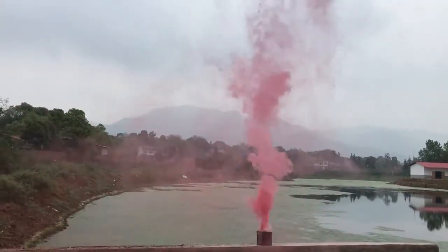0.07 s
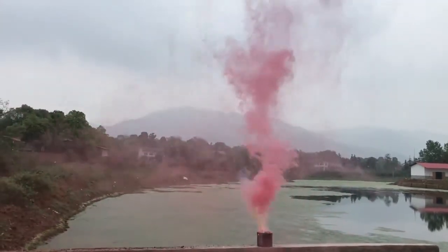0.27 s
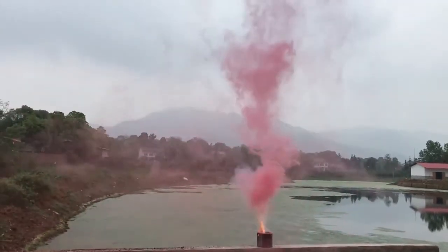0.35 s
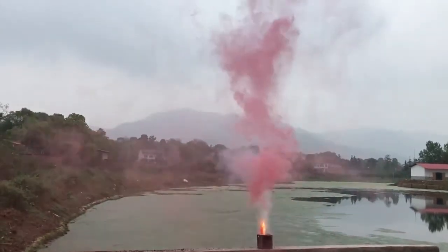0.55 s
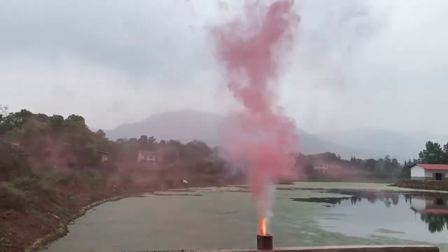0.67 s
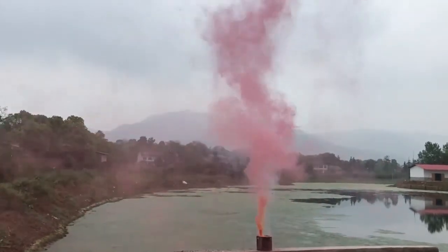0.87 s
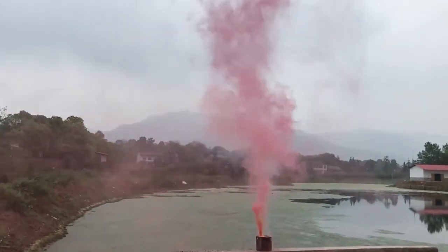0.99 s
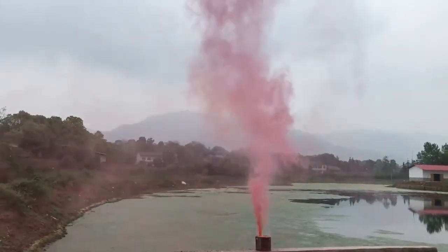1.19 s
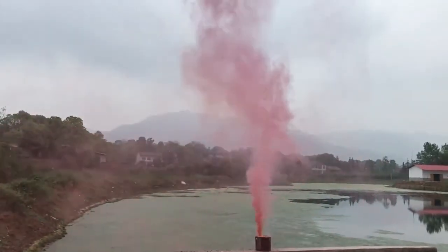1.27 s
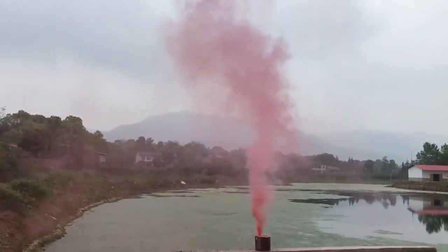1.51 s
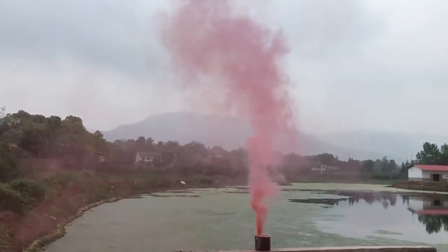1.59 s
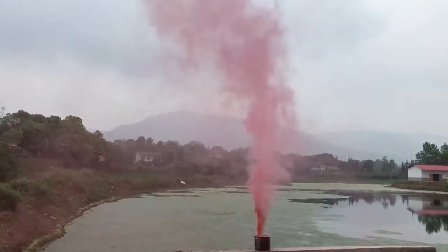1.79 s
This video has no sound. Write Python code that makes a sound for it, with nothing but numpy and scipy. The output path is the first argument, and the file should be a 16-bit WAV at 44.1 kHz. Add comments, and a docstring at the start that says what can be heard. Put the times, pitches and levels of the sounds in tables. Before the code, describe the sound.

A burning smoke canister hisses with a fine sputter, close by outdoors. Early on it flares in a bright rush that sinks to a soft low flutter, then keeps hissing over a faint rumble.

```python
"""A smoke canister burns on a wall beside a pond, its vent hissing with a fine sputter of burning grains.
It flares up once: a bright rush that sinks into a soft low flutter as the puff of gas grows and slows.
A low hum comes in as the flare dies, and a nearby hard surface gives the hiss a hollow colour.
Behind it are a low outdoor rumble with a few drones and one faint bird call."""
import sys
import numpy as np
from scipy import signal
from scipy.fft import rfft, irfft
from scipy.io import wavfile

SR = 44100
rng = np.random.default_rng(int(sys.argv[2]) if len(sys.argv) > 2 else 0)


def transcribe(u):
    """Save the signal u as a 16-bit wav file named by the first command-line argument.

    u: samples, shape (n,) or (channels, n), limited to [-1, 1]; the rate is SR.
    q: integer samples, one column per channel.
    """
    v = np.clip(np.atleast_2d(u).T, -1, 1)
    q = np.round(v * 32767).astype(np.int16)
    wavfile.write(sys.argv[1], SR, q)


N = 81585

# Tone of the gas jet at the vent. Each row: frequency in Hz, relative level in dB.
JET_SPECTRUM = [(30, -14), (90, 3.5), (250, 3.5), (500, -0.5), (700, 0), (980, -2.5), (1170, 2.5),
                (1800, -2.5), (2400, -4), (2780, -1), (2980, -7.5), (3400, 2), (4100, -1.5), (4700, -2),
                (5200, -8), (5500, -3), (6050, -3), (6600, -4), (7400, -7.5), (8100, -6.5), (9900, -9),
                (10900, -17), (11700, -8.5), (13300, -11), (15500, -11.5)]
# Swells of the steady burn. Each row: time in seconds, gain on the jet in dB.
BURN_GAIN = [(0, -2.5), (.18, -1.1), (.45, 0), (.65, -2.5), (.8, -1), (.93, -1.1), (1.03, 1), (1.12, -.5),
             (1.3, 0), (1.42, -0.2), (1.53, 1.6), (1.7, 0.4), (1.85, 0.5)]
# Brightness of the steady burn. Each row: time in seconds, tilt in dB per octave about TILT_PIVOT_HZ.
BURN_TILT = [(0, 1.9), (.2, 0.4), (.6, 1), (.8, -0.4), (1.0, 0.04), (1.4, 0.7), (1.85, 0.9)]
# Air on top of the steady burn. Each row: time in seconds, slope in dB per octave above AIR_FROM_HZ.
BURN_AIR = [(0, -4), (.2, 3), (.6, 0.5), (.9, 2), (1.2, -5), (1.5, -5), (1.85, -12)]
# Envelope of the flare. Each row: time in seconds, gain on the jet at the flare's centre in dB.
FLARE_GAIN = [(.17, -9), (.226, 2), (.243, 11.5), (.272, 15.5), (.292, 20), (.308, 20), (.322, 21.5),
              (.352, 21), (.39, 16), (.425, 17.5), (.47, 15), (.52, 14), (.565, 13), (.61, 12.5), (.69, 9),
              (.78, 5), (.95, -25)]
# Bounce off the nearby surface. Each row: frequency in Hz, amplitude as a share of the direct sound.
REFLECTION_SHARE = [(300, 0), (900, 0.79), (2500, 0.65), (4200, 0.69), (5900, 0.72), (7600, 0.8),
                    (9200, 0.57), (11000, 0.2), (14500, 0.3)]
# Arch of the distant bird call. Each row: time in seconds, pitch in Hz.
BIRD_PITCH = [(.655, 2700), (.683, 2840), (.698, 3060), (.714, 3076), (.727, 2890), (.735, 2500),
              (.745, 2450)]
# Tone of the outdoor bed. Each row: frequency in Hz, relative level in dB.
RUMBLE_SPECTRUM = [(20, -34), (32, -20), (47, 1.5), (70, 1), (130, -4), (250, -6), (320, -9), (380, -16),
                   (700, -13), (1200, -13.5), (4000, -22.5), (7600, -27.5), (11000, -31), (15000, -42)]
# Droning bands in the bed. Each row: centre in Hz, half-width in Hz, level in dB.
DRONE_BANDS = [(97.8, 4.6, -70.5), (197, 11.4, -73), (211.7, 15, -65), (290, 18.3, -66.5)]

TILT_PIVOT_HZ, AIR_FROM_HZ = 3500, 8900


def vent(gain_db=-55, frame=512):
    """The canister's hiss: one jet of gas, shaped by the steady burn, the flare and a slight flicker."""
    framing = dict(fs=SR, nperseg=frame, noverlap=frame - frame // 4)
    hz, t, jet = signal.stft(gas(), **framing)
    octave = np.log2(np.maximum(hz, hz[1] / 2))[:, None]
    jet = jet * np.hypot(steady_burn(t, octave), flare(t, octave)) * flicker(t, hz)
    return amp(gain_db) * signal.istft(jet, **framing)[1][:N]


def gas(pops_per_s=3400, spread_db=3.0, sputter_db=-11):
    """Rushing gas mixed with the tiny pops of burning grains."""
    sizes = amp(spread_db * np.minimum(rng.exponential(1, N), 5))
    pops = sizes * rng.choice([-1, 1], N) * (rng.random(N) < pops_per_s / SR)
    rush = rng.standard_normal(N)
    return coloured(rush + amp(sputter_db) * unit_rms(pops), amp(over_frequency(JET_SPECTRUM)))


def steady_burn(t, octave):
    """A moving EQ for the steady burn, which drifts in level, brightness and air."""
    from_pivot = np.maximum(octave - np.log2(TILT_PIVOT_HZ), -2)  # the tilt levels off in the lows
    into_air = np.maximum(octave - np.log2(AIR_FROM_HZ), 0)
    tone_db = over_time(BURN_TILT, t) * from_pivot + over_time(BURN_AIR, t) * into_air
    return amp(over_time(BURN_GAIN, t) + tone_db)


def flare(t, octave, end_hz=90, sweep_hz=7670, hold_until_s=0.31, halvings_per_s=17.4):
    """A broad hump of turbulence holds in the treble, then dives as the puff grows and slows."""
    centre_hz = end_hz + sweep_hz * 2 ** (-halvings_per_s * np.maximum(t - hold_until_s, 0))
    from_centre = octave - np.log2(centre_hz)
    hump_db = -1.3 * from_centre ** 2
    roar_db = np.maximum(hump_db, -12.5)  # a shelf of roar stays below the hump
    return amp(over_time(FLARE_GAIN, t) + np.where(from_centre < 0, roar_db, hump_db))


def flicker(t, hz, overall_db=0.5, overall_s=0.0068, patch_db=0.79, patch_s=0.028, patch_hz=600):
    """The jet is unsteady: its gain trembles quickly as a whole and more slowly in patches of tone."""
    overall = smoothed(rng.standard_normal((1, len(t))), overall_s / t[1], axis=1)
    patches = smoothed(rng.standard_normal((len(hz), len(t))), patch_s / t[1], axis=1)
    patches = smoothed(patches, patch_hz / hz[1], axis=0)
    return amp(overall_db * overall + patch_db * patches)


def hum(pitch_hz=98, level_db=-62, start_s=0.52, rise_s=0.017, end_s=0.94, fade_s=0.064):
    """A low wavering hum comes in as the flare dies away."""
    t = np.arange(N) / SR
    waver = 0.03 * smoothed(rng.standard_normal((1, N)), 0.1 * SR, axis=1)[0]  # slow 3 % pitch drift
    envelope = np.clip((t - start_s) / rise_s, 0, 1) * np.clip((end_s - t) / fade_s, 0, 1)
    return amp(level_db) * envelope * tone(pitch_hz * (1 + waver))


def near_reflection(x, delay_s=0.000596):
    """One very early bounce off a hard surface hollows the hiss with evenly spaced notches."""
    share = over_frequency(REFLECTION_SHARE)
    comb = 1 + share * np.exp(-2j * np.pi * bins() * delay_s)
    return irfft(rfft(x) * comb / np.hypot(1, share), N)


def scatter(x, t60_s):
    """A dying cloud of small reflections from the banks and trees."""
    tail = rng.standard_normal(N) * np.exp(-np.log(1000) * np.arange(N) / SR / t60_s)
    return signal.fftconvolve(x, tail / np.linalg.norm(tail))[:N]


def bird(level_db=-66, fade_s=0.008, wet=0.77):
    """One thin, arched whistle, blurred by distance."""
    t = np.arange(N) / SR
    start_s, end_s = BIRD_PITCH[0][0], BIRD_PITCH[-1][0]
    envelope = np.clip(np.minimum(t - start_s, end_s - t) / fade_s, 0, 1)
    call = envelope * tone(over_time(BIRD_PITCH, t))
    return amp(level_db) * (call + wet * scatter(call, t60_s=0.12))


def outdoor_bed(rumble_db=-59.5):
    """Low outdoor rumble with a few wavering drones, as of a far engine."""
    bed = amp(rumble_db) * coloured(rng.standard_normal(N), amp(over_frequency(RUMBLE_SPECTRUM)))
    for centre_hz, half_width_hz, level_db in DRONE_BANDS:
        band = 1 / (1 + ((bins() - centre_hz) / half_width_hz) ** 2)
        bed += amp(level_db) * coloured(rng.standard_normal(N), band)
    return bed


def amp(db):
    """Decibels to gain."""
    return 10 ** (np.asarray(db) / 20)


def unit_rms(x):
    """Scales to rms 1."""
    return x / np.sqrt(np.mean(x ** 2) + 1e-20)


def tone(hz):
    """A sine at rms 1 that follows a pitch curve."""
    return np.sqrt(2) * np.sin(2 * np.pi * np.cumsum(hz) / SR)


def bins():
    """Frequencies of the whole-length spectrum in Hz."""
    return np.fft.rfftfreq(N, 1 / SR)


def over_time(points, t):
    """Reads a table as an automation curve."""
    return np.interp(t, *np.transpose(points))


def over_frequency(points):
    """Reads a table as an EQ curve over log frequency, one value per bin."""
    hz, value = np.transpose(points)
    return np.interp(np.log(bins() + 1), np.log(hz), value)


def coloured(x, gain):
    """Filters x by a gain per frequency, at rms 1."""
    return unit_rms(irfft(rfft(x) * gain, N))


def smoothed(x, steps, axis):
    """Smooths random values over about this many steps, at rms 1."""
    rate = np.fft.rfftfreq(x.shape[axis])
    gain = np.expand_dims(np.exp(-2 * (rate * steps) ** 2), 1 - axis)
    return unit_rms(irfft(rfft(x, axis=axis) * gain, x.shape[axis], axis=axis))


def scene():
    """The mono mix: the canister up front with a faint tail, the pond's background behind it."""
    hiss = near_reflection(vent())
    return (hiss + hum() + outdoor_bed() + bird() + amp(-13) * scatter(hiss, t60_s=0.14))[None]


def record(dry, cutoff_hz=15800):
    """A steep low-pass trims the very top."""
    low_pass = signal.firwin(601, cutoff_hz, window=("kaiser", 9), fs=SR)
    return signal.oaconvolve(dry, low_pass[None], "same")


dry = scene()
out = record(dry)
transcribe(out)
```